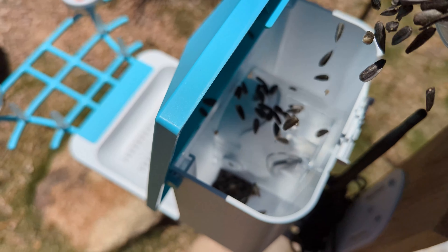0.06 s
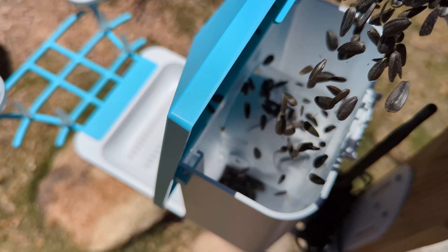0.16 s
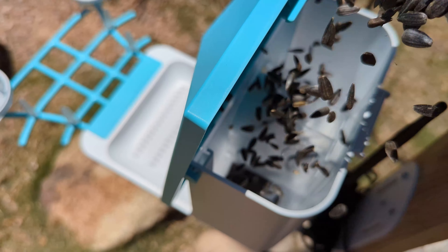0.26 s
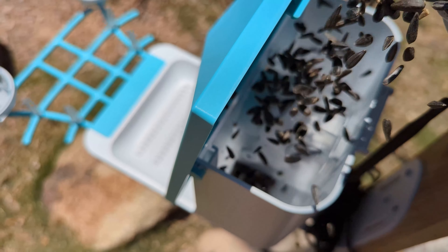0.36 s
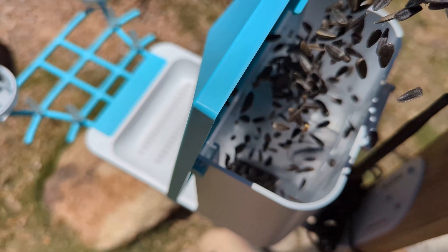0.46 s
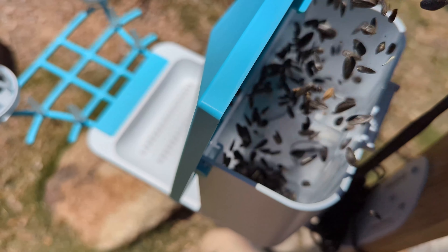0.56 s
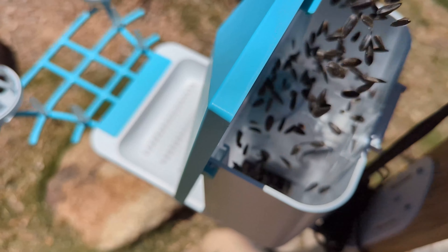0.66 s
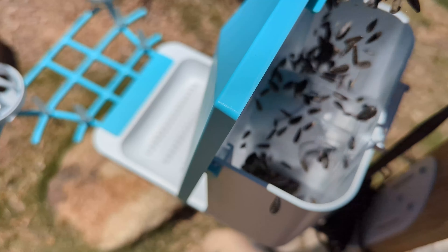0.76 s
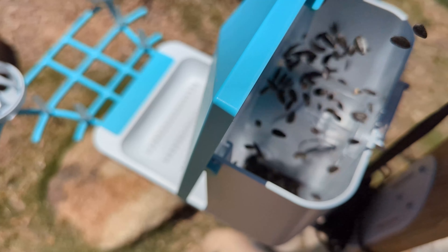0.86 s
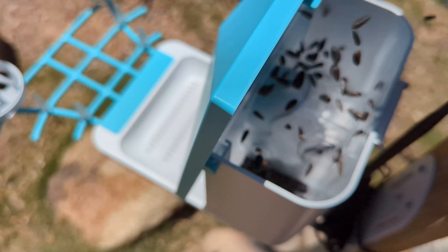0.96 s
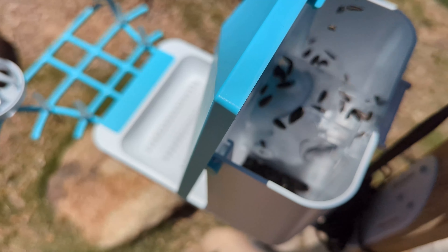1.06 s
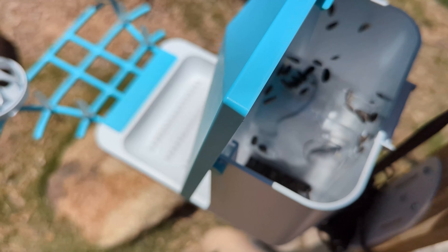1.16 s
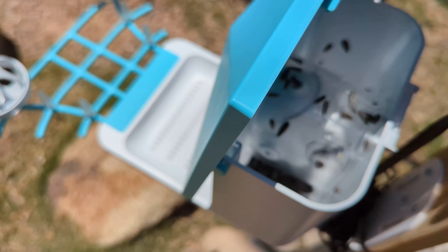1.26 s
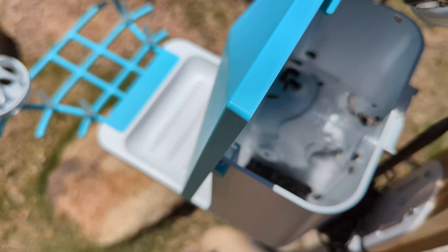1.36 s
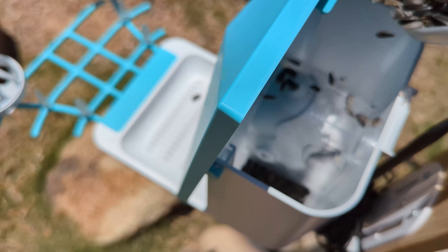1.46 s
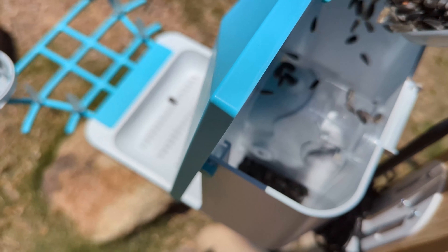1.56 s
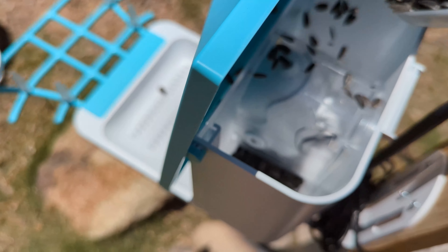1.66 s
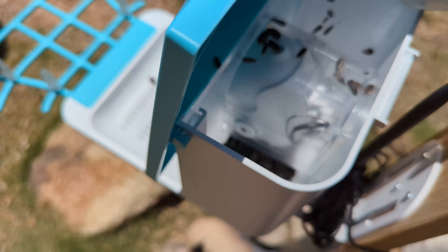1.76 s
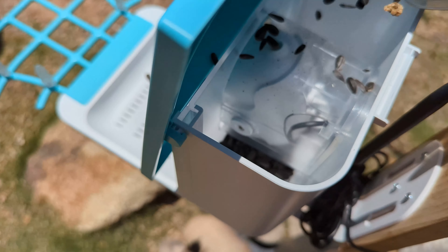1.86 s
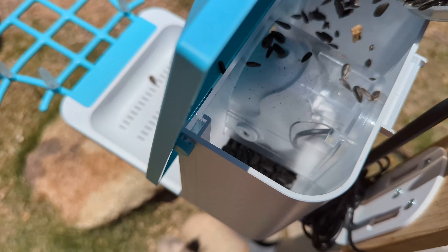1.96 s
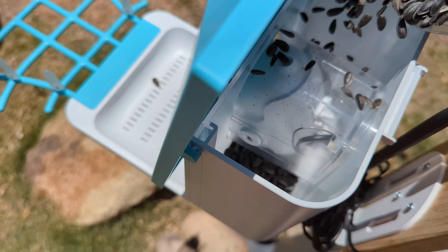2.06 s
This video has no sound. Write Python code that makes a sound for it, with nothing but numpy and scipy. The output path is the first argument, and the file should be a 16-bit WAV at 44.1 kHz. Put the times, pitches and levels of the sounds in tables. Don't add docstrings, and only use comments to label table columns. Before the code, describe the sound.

Close microphone outdoors, dry and without echo: hard little seeds patter, then rush crisply against hollow plastic walls, fade into sparse taps and faint knocks, and a light trickle begins over a barely audible low hum.

```python
import sys
import numpy as np
from scipy import signal
from scipy.fft import rfft, irfft
from scipy.io import wavfile

SR = 44100
rng = np.random.default_rng(int(sys.argv[2]) if len(sys.argv) > 2 else 0)


def makeup_ratio(level_db):
    decades = np.asarray(level_db, float) / 20
    return 10 ** decades


def unload_wav(signal):
    wavfile.write(
        sys.argv[1],
        SR,
        np.round(np.clip(np.atleast_2d(signal).T, -1, 1) * 32767).astype(np.int16),
    )


N = 92610

# time in seconds, level in dB.
FLOW = [(0.149, -77), (.21, -45), (.34, -36), (0.354, -43.5), (0.4, -18.5), (.51, -19.5), (1.05, -30),
        (1.12, -38.5), (1.34, -45), (1.40, -69), (1.5, -43), (1.57, -71), (1.729, -85), (1.85, -67.5),
        (1.88, -55), (1.93, -52), (2.0, -59.5), (2.1, -65)]
# frequency in Hz, width in Hz, level in dB,
# extra dB once seeds strike the rim.
BRIGHT = [(2840, 95, -13.5, 22), (3760, 182, -23.5, 33), (5400, 940, -5, 9.5), (6815, 98, -0.5, -24),
          (8380, 2950, -8, 0.5), (12140, 680, -9, 6)]
# frequency in Hz, level in dB, T60 in seconds,
# extra dB once seeds strike the rim.
WALLS = [(363, -18, 0.092, -8), (419.6, -2, 0.11, -13), (472, 1.5, 0.11, 2), (526, -0.5, 0.09, -10),
         (673, -12, 0.0085, 1), (842, 2, 0.027, -10), (981, 3.5, 0.035, 8), (1078, 3, 0.057, 3),
         (1161, 1.5, 0.044, 7), (1470, 0.5, 0.033, -1), (1673, -4.5, 0.019, 4.5)]


def rms_one(x):
    return x / np.sqrt(np.mean(x ** 2) + 1e-20)


def shape(x, points):
    hz, db = np.transpose(points)
    f = np.arange(N // 2 + 1) * SR / N + 1
    corners_hz = np.r_[hz[0] / 2, hz, hz[-1] * 2]
    corners_db = np.r_[db[0] - 30, db, db[-1] - 30]
    gain = makeup_ratio(np.interp(np.log(f), np.log(corners_hz), corners_db))
    return irfft(rfft(x) * gain, N)


def resonance(x, hz, width_hz):
    r = np.exp(-np.pi * width_hz / SR)
    b = (1 - r * r) / 2
    return signal.lfilter([b, 0, -b], [1, -2 * r * np.cos(2 * np.pi * hz / SR), r * r], x)


def seeds():
    panel, *levels = envelopes(landings())
    rim_end = 3 + len(BRIGHT)
    # frequency in Hz, level in dB.
    shell_colour = [(1200, -22.5), (2200, -28), (3800, -16.5), (6200, -18), (8600, -9.5), (12000, -13),
                    (14500, -20.5), (16300, -28.5)]
    even = rms_one(shape(clicks(), shell_colour))
    return shells(even, levels[:3]) + rim(even, levels[3:rim_end], panel) + walls(levels[rim_end:])


def landings():
    # start in seconds, level in dB, length in seconds, drumming in dB.
    faint = [
        (.024, -68, 0.0043, -20),
        (.055, -73, .004, -20),
        (1.867, -46, 0.013, 6),
    ]
    first = [(0.151, -28.5, 0.0063, -21), (0.1954, -17.5, 0.0057, -6), (0.217, -21, 0.0014, 4),
             (0.224, -14.5, 0.0044, -34), (0.2389, -12, 0.0086, -1.5), (0.2644, -16.5, 0.0021, 8.5),
             (0.274, -16.5, 0.0033, -2), (0.288, -17.5, 0.0034, -6), (0.3055, -18.5, 0.0043, 0),
             (0.315, -18.5, 0.0036, -15), (0.3244, -18.5, 0.0045, -25), (0.3346, -18.5, 0.0077, -11),
             (0.3638, -12, 0.0036, 1), (0.391, -10, 0.012, -2), (0.4272, -13, 0.01, 4),
             (0.4461, -13, 0.0012, -13), (0.459, -15.5, 0.0096, 3), (0.494, -11.5, 0.017, -4)]
    last = [(1.5834, -49, 0.0033, 0), (1.598, -41.5, 0.0054, 9), (1.6206, -50, 0.014, 14),
            (1.648, -60, 0.002, 16.5), (1.664, -49.5, 0.0012, 8.5), (1.6774, -43, 0.0023, -13),
            (1.7064, -74, 0.0021, 5), (1.717, -60.5, 0.0018, 0), (1.751, -44, 0.0026, -5),
            (1.77, -47, 0.0019, 7.5), (1.795, -48, 0.0017, -10), (1.8044, -45.5, 0.0028, -5),
            (1.8193, -44.5, 0.0024, 3), (1.8357, -41, 0.0019, 7)]
    trickle = [(1.879, -41, 0.005, -1), (1.8943, -41, 0.0013, -1), (1.9033, -40, 0.01, 0.5),
               (1.918, -38.5, .003, 2), (1.951, -28.5, 0.0047, -5.5), (1.9674, -33, 0.0066, -3),
               (1.9851, -35, 0.0018, 0), (2.009, -48, 0.0045, 2), (2.022, -46, 0.0027, -2),
               (2.058, -41, 0.0028, -17), (2.068, -48, 0.0012, -21), (2.077, -44.5, 0.0034, -17),
               (2.09, -43, 0.0063, -11.5)]
    # start in seconds, level in dB, length in seconds, panel in dB.
    rush = [(0.514, -26, 0.017, -6), (0.525, -10, 0.012, 15.5), (0.532, -8.6, 0.00083, 16.5),
            (0.543, -9, 0.0044, 4), (0.551, -22, 0.014, 7), (0.561, -15, 0.011, -6), (0.583, -8, 0.026, 3),
            (0.6, -20, 0.0074, 0), (0.605, -12.5, 0.02, -15), (0.629, -10, 0.012, -15),
            (0.64, -14, 0.017, -13), (0.649, -9, 0.0011, -12), (0.656, -9.2, 0.001, -11),
            (0.668, -14, 0.011, -8), (0.674, -8.5, 0.00085, -9), (0.686, -9, 0.015, 2),
            (0.705, -14, 0.036, -10), (0.717, -12.5, 0.013, -10), (0.734, -10.5, 0.0043, -7),
            (0.743, -11.5, 0.017, 3), (0.764, -13.5, 0.014, 5), (0.781, -13.5, 0.025, 10),
            (0.796, -11.5, 0.0023, 10), (0.805, -15, 0.0056, 13), (0.819, -17.5, 0.019, 0),
            (0.835, -9, 0.021, -3), (0.862, -8, 0.0025, 10.5), (0.873, -15.5, 0.015, -8),
            (0.883, -11.5, 0.017, -4), (0.901, -10.5, 0.012, -5), (0.916, -13, 0.017, 13.5),
            (0.935, -10.5, 0.004, 2), (0.945, -13, 0.016, -11), (0.962, -10.5, 0.0025, -7),
            (0.969, -12, 0.022, -16), (0.977, -12, 0.00082, -13), (0.988, -13.5, 0.005, -1),
            (0.993, -17.9, 0.013, 7), (1.0, -18, 0.001, 6), (1.01, -13.5, 0.0065, 1),
            (1.015, -13.5, 0.016, -2), (1.036, -13.5, 0.017, -10), (1.051, -14, 0.017, -7),
            (1.066, -17, 0.001, 5), (1.071, -12, 0.0011, 3), (1.078, -18.7, 0.019, -1),
            (1.089, -14, 0.001, 1)]
    # start in seconds, level in dB, length in seconds,
    # drumming in dB, panel in dB.
    thinning = [(1.109, -13, 0.0073, -8, -3), (1.115, -24.5, 0.02, 7, -7), (1.13, -14, 0.0064, 2.5, -9),
                (1.147, -13.5, 0.01, 1, -10), (1.165, -21.5, 0.0043, 6, 0), (1.176, -13, 0.0033, -5.5, -4),
                (1.19, -24.5, 0.0028, 8, -8), (1.202, -13, 0.001, 0, -11), (1.21, -27, 0.011, 12, -1),
                (1.218, -20, 0.017, -1, 4), (1.227, -27, 0.0094, 12.5, 4), (1.243, -16, 0.001, -10, 15.5),
                (1.256, -18, 0.0083, 1, 3), (1.274, -23.3, 0.001, 2, -3), (1.279, -21.7, 0.011, -10, -5),
                (1.285, -29, 0.017, 0, 1), (1.297, -12, 0.017, -7.5, 5), (1.321, -20, 0.0065, -1.5, 1),
                (1.341, -16.5, 0.0024, -5, -17), (1.368, -36, 0.0025, 8, -13), (1.374, -24, 0.013, -5, -14),
                (1.392, -40.5, 0.005, 7.5, 15), (1.416, -34, 0.012, -4, -6), (1.424, -25.5, 0.01, -7, -16),
                (1.441, -21, 0.001, -11, -17), (1.456, -27.5, 0.0025, -12, -14),
                (1.466, -39, 0.008, -2, -4), (1.47, -29.5, 0.021, -3, -8), (1.488, -36.5, 0.019, 7, 4),
                (1.5, -41, 0.0087, 0, -3), (1.506, -24, 0.018, 1.5, -11), (1.524, -39.5, 0.01, 12.5, 19.5),
                (1.543, -27.5, 0.001, 1.5, 4), (1.563, -53.7, 0.001, 8, 15)]
    seeds_per_s, spread_db, mean_length_s, stream_db = 160, 6, 0.0028, 3
    panel_idle_db = -5.5

    s, level_db = np.transpose(FLOW)
    draw = rng.random((600, 3))
    when = s[0] + np.cumsum(-np.log(1 - draw[:, 0])) / seeds_per_s
    db = np.interp(when, s, level_db) + stream_db + spread_db * 2 * (draw[:, 1] - 0.5)
    stream = np.transpose([when, db, mean_length_s * 2 * draw[:, 2], 0 * when])
    plain = np.vstack([faint, first, last, trickle, stream[when < N / SR]])
    plain = np.c_[plain, np.full(len(plain), panel_idle_db)]
    return np.vstack([np.insert(rush, 3, 0, axis=1), thinning, plain])


def landing_form(length):
    touch_s, touch_db, attack_s = 0.0031, -16, 0.0012
    release_t60_s, tail_db, tail_t60_s = 0.038, -19, 0.049
    sag_db_per_s = 242
    t = np.arange(4000) / SR - touch_s
    after = np.maximum(t - attack_s - abs(length), 0)
    rise = np.maximum(np.clip(t / attack_s, 0, 1) ** 4, makeup_ratio(2 * touch_db))
    body = makeup_ratio(-120 * after / release_t60_s - 2 * sag_db_per_s * np.maximum(t - after, 0))
    tail = makeup_ratio(2 * tail_db - 120 * after / tail_t60_s)
    lead_s = touch_s + attack_s / 2
    return rise * (body + tail), lead_s


def envelopes(rows):
    landing_db, bed_db = -3, -2.5
    tilt_spread_db, ring_spread_db, mode_spread_db = 3, 5, 4.5
    rim_s, rim_dull_db = 1.86, -3
    light_s, light_db = 1.19, -3.5
    other = 3 + len(BRIGHT)
    count = other + len(WALLS)
    drummed = np.r_[np.zeros(other), np.ones(len(WALLS))]
    spread_db = np.r_[tilt_spread_db, 0, tilt_spread_db,
                      np.full(len(BRIGHT), ring_spread_db), np.full(len(WALLS), mode_spread_db)]
    rim_db = np.r_[rim_dull_db, 0, 0, [row[3] for row in BRIGHT], [row[3] for row in WALLS]]
    lightness_db = np.r_[np.zeros(other), [light_db * (row[0] < 600) for row in WALLS]]

    power = np.zeros((count + 1, N + 4000))
    colours = np.clip(rng.standard_normal((len(rows), count)), -2, 1)
    for (s, db, length, drum_db, panel_db), colour in zip(rows, colours):
        form, lead_s = landing_form(length)
        part_db = colour * spread_db + drummed * drum_db
        part_db = part_db + rim_db * (s > rim_s) + lightness_db * (s > light_s)
        gain = makeup_ratio(2 * (db + landing_db + np.r_[panel_db, part_db]))
        i = max(int((s - lead_s) * SR), 0)
        power[:, i:i + len(form)] += gain[:, None] * form

    s, level_db = np.transpose(FLOW)
    bed = np.interp(np.arange(N) / SR, s, level_db, left=-120) + bed_db
    return np.sqrt(power[:, :N] + makeup_ratio(2 * bed))


def clicks():
    clicks_per_s, size_spread_db = 14000, 2.3
    draw = rng.random((3, N))
    sizes = makeup_ratio(-size_spread_db * np.log(draw[0] + 0.0023)) * np.sign(draw[1] - 0.5)
    return rms_one(sizes * (draw[2] < clicks_per_s / SR))


def shells(even, levels):
    dull = signal.sosfiltfilt(signal.butter(2, 5000, fs=SR, output="sos"), even)
    bright = signal.sosfiltfilt(signal.butter(2, 11000, "high", fs=SR, output="sos"), even)
    return levels[0] * dull + levels[1] * (even - dull - bright) + levels[2] * bright


def rim(even, levels, panel):
    panel_hz, panel_width_hz, panel_db = 3982, 230, -2
    out = makeup_ratio(panel_db) * resonance(panel * even, panel_hz, panel_width_hz)
    for level, (hz, width_hz, db, _) in zip(levels, BRIGHT):
        out = out + makeup_ratio(db) * resonance(level * even, hz, width_hz)
    return out


def walls(levels):
    blows_db, knock_deep_db = -1, 10
    blows = makeup_ratio(blows_db) * clicks()
    plain_knocks, third_knocks = knocks()
    out = np.zeros(N)
    for k, (level, (hz, db, t60, _)) in enumerate(zip(levels, WALLS)):
        knock = third_knocks if k == 2 else plain_knocks
        knock = knock * makeup_ratio(knock_deep_db * (hz < 380))
        width_hz = np.log(1000) / np.pi / t60
        out += (-1) ** k * makeup_ratio(db) * resonance(level * blows + knock, hz, width_hz)
    return out


def knocks():
    # time in seconds, peak in dB, extra dB of the third mode.
    knock_rows = [
        (1.538, -46, 9),
        (1.573, -50.5, 5.5),
        (1.611, -39.5, 0.5),
        (1.775, -29.5, -16),
        (1.842, -51, 4.5),
    ]
    knock_db, soft_hz = 44.5, 600
    s, db, third_db = np.transpose(knock_rows)
    pulses = np.zeros((2, N))
    pulses[:, (s * SR).astype(int)] = makeup_ratio([db + knock_db, db + knock_db + third_db])
    return signal.sosfilt(signal.butter(14, soft_hz, fs=SR, output="sos"), pulses)


def distance():
    # frequency in Hz, level in dB.
    hum_lines = [(75.4, -68), (236.9, -74)]
    # frequency in Hz, level in dB.
    rumble_colour = [(25, 7.5), (60, 0), (130, 0), (300, -10), (2500, -12)]
    hum_width_hz, steady_share, rumble_db = 12, 0.55, -71.5
    white = rng.standard_normal(N)
    t = np.arange(N) / SR
    out = makeup_ratio(rumble_db) * rms_one(shape(rng.standard_normal(N), rumble_colour))
    for hz, db in hum_lines:
        steady = np.sqrt(2) * np.sin(2 * np.pi * hz * t)
        wavering = rms_one(resonance(white, hz, hum_width_hz))
        out += makeup_ratio(db) * (steady_share * steady + (1 - steady_share) * wavering)
    return out


def scene():
    gate_s, gate_db, body_cut_hz = 0.176, -16, 402
    gate = makeup_ratio(np.interp(np.arange(N) / SR, [gate_s - 0.01, gate_s], [gate_db, 0]))
    rounded = 0.9 * np.tanh(1.091 * seeds())
    near = signal.sosfilt(signal.butter(2, body_cut_hz, "high", fs=SR, output="sos"), rounded)
    return (near + gate * distance())[None]


def band_limit(x):
    return signal.sosfilt(signal.butter(12, 16350, fs=SR, output="sos"), x)


def record(dry):
    top_hz = 16150
    mix = signal.sosfilt(signal.cheby2(20, 70, top_hz, fs=SR, output="sos"), dry)
    return band_limit(mix)


dry = scene()
out = record(dry)
unload_wav(out)
```